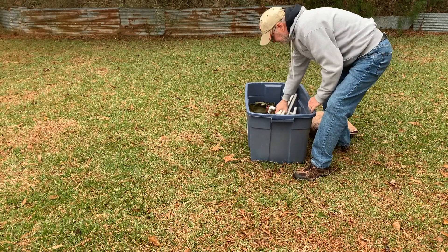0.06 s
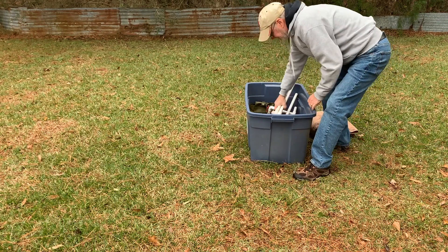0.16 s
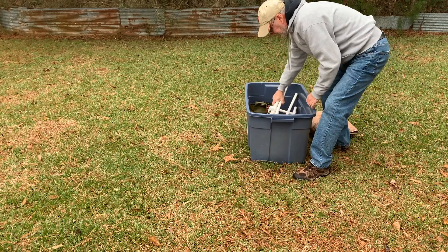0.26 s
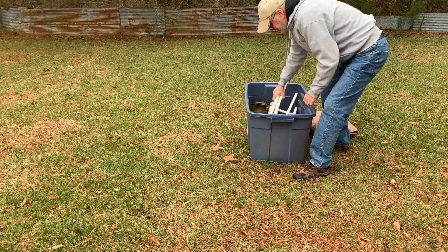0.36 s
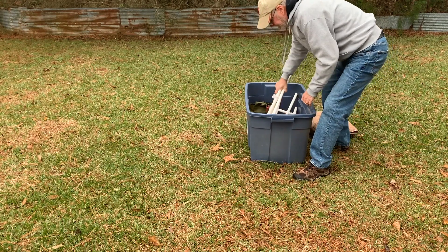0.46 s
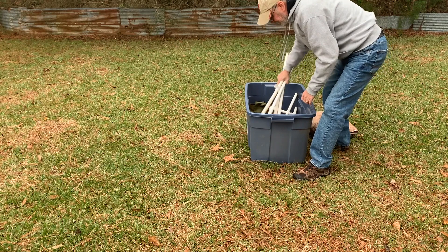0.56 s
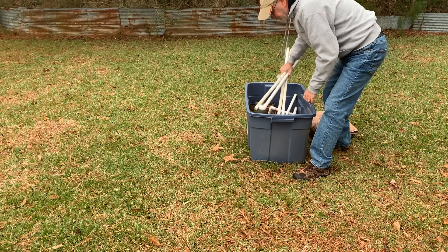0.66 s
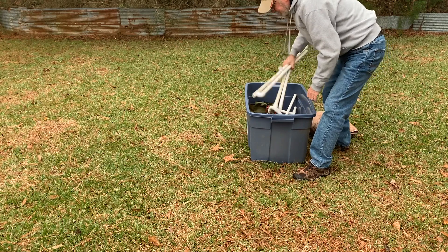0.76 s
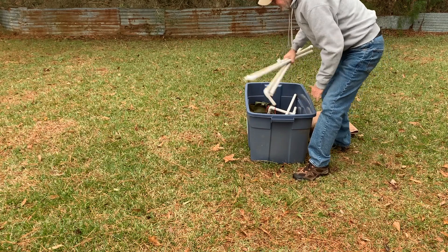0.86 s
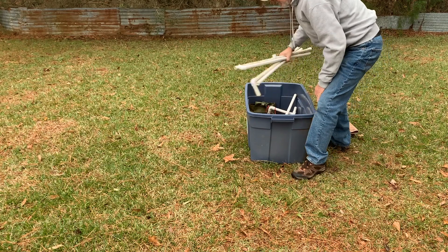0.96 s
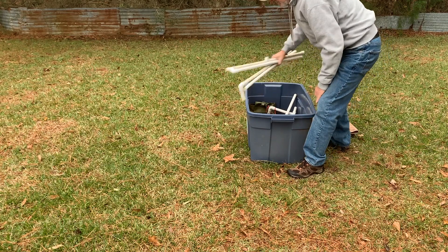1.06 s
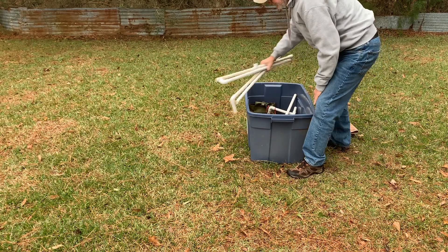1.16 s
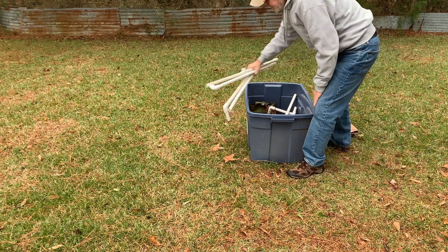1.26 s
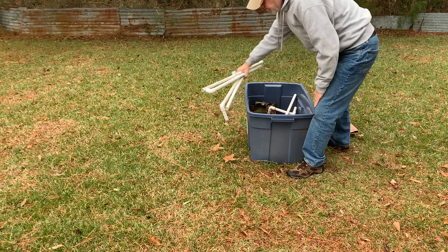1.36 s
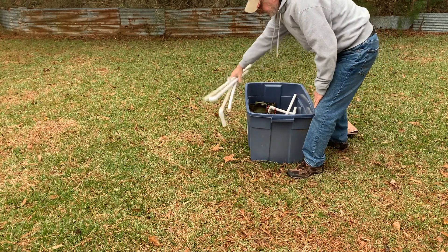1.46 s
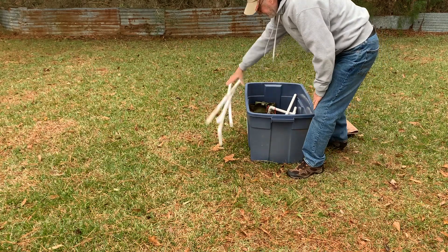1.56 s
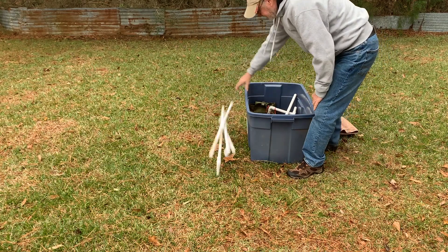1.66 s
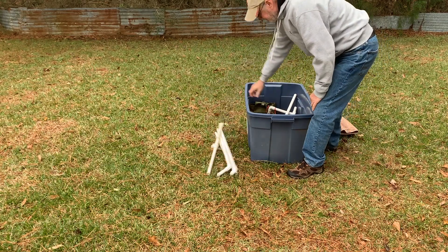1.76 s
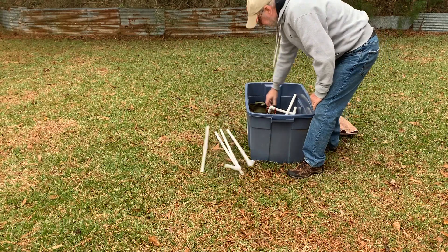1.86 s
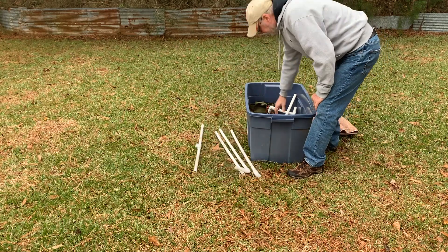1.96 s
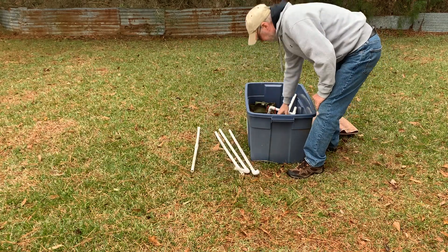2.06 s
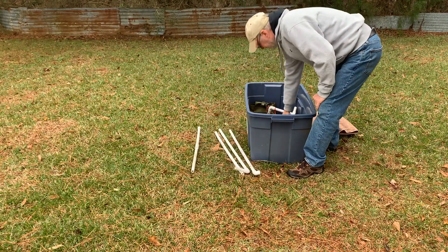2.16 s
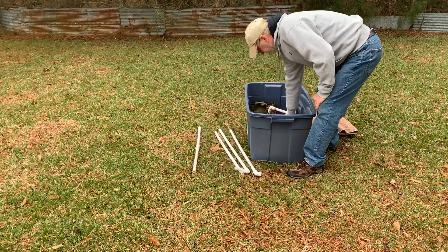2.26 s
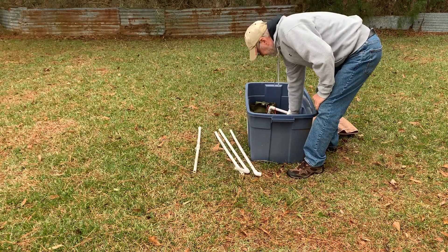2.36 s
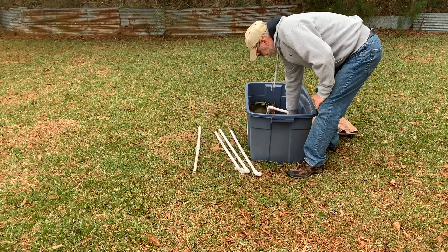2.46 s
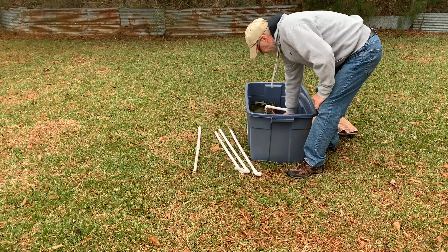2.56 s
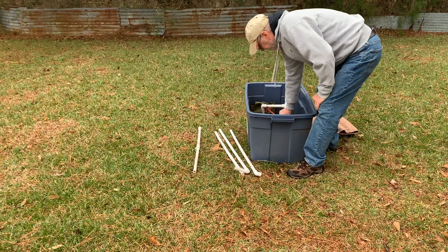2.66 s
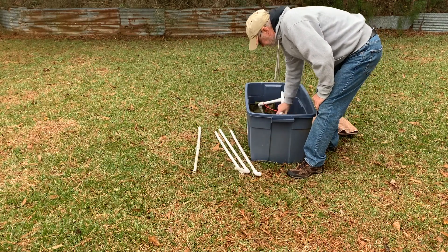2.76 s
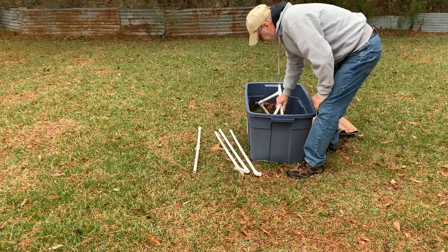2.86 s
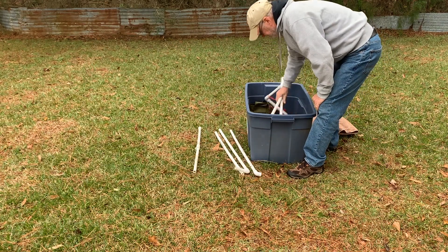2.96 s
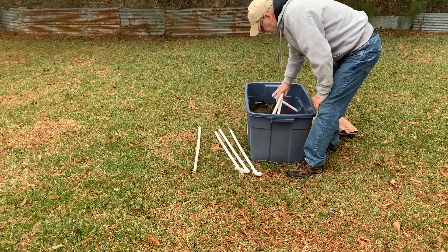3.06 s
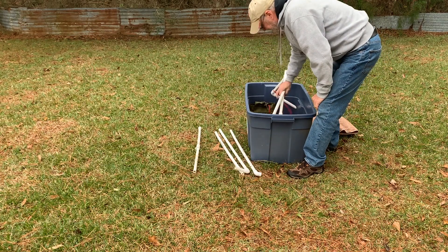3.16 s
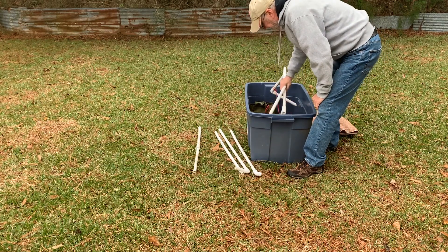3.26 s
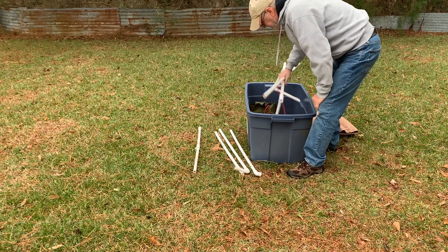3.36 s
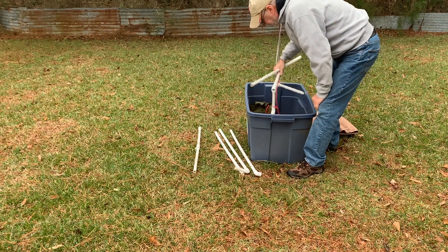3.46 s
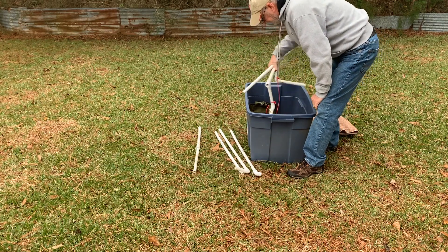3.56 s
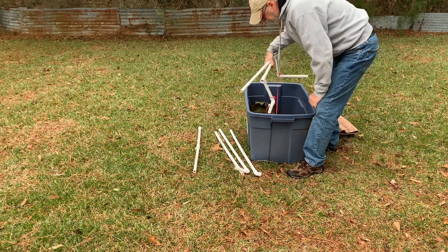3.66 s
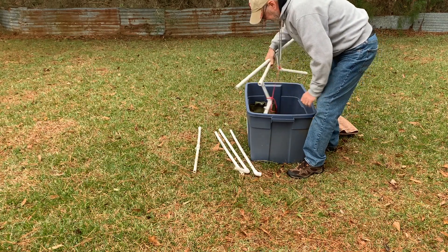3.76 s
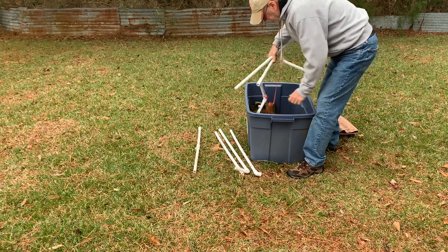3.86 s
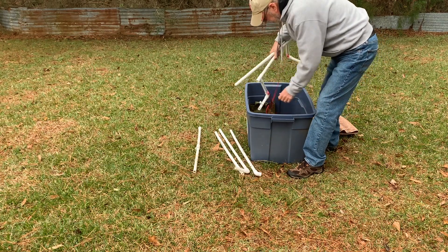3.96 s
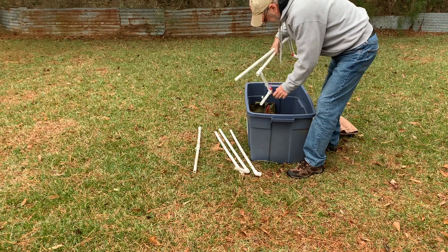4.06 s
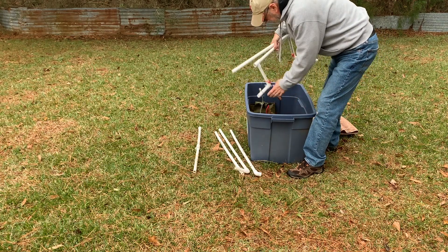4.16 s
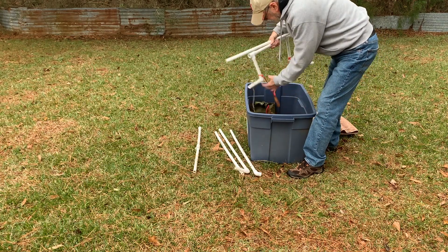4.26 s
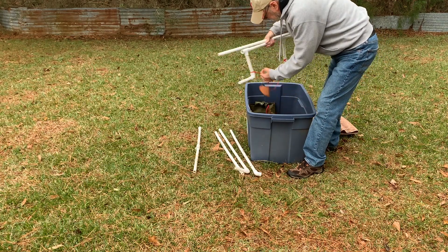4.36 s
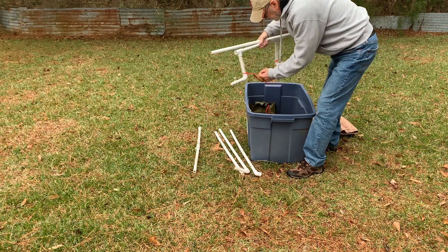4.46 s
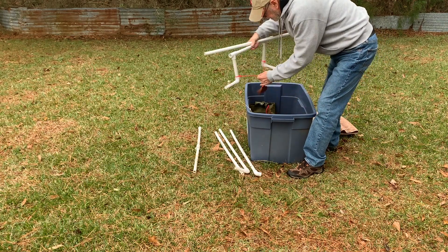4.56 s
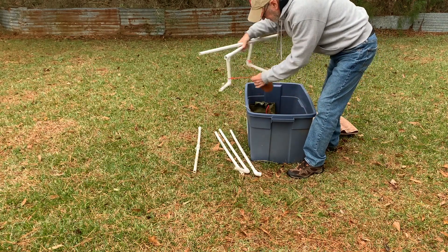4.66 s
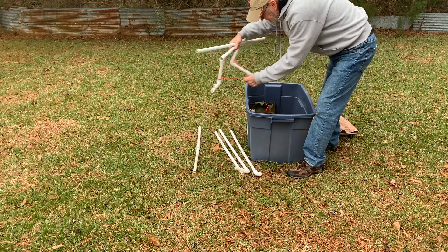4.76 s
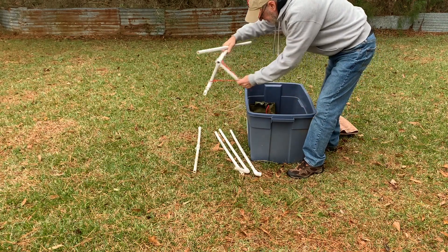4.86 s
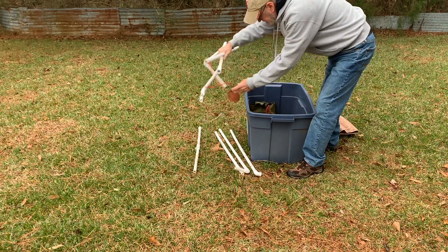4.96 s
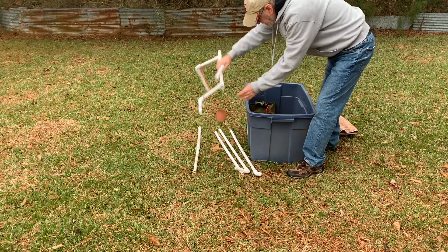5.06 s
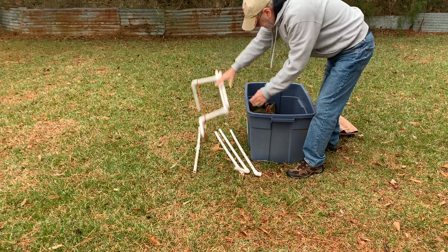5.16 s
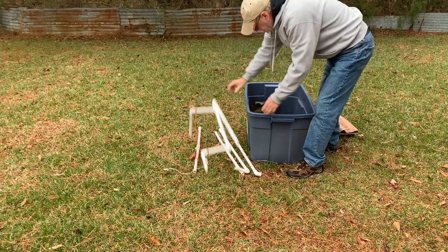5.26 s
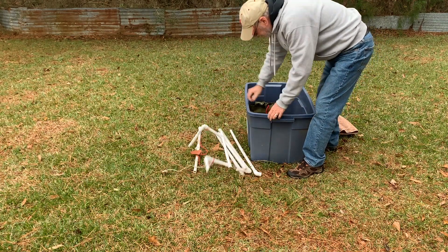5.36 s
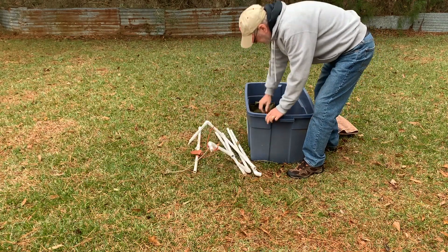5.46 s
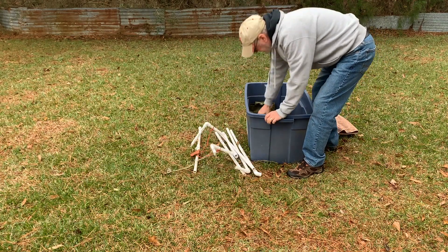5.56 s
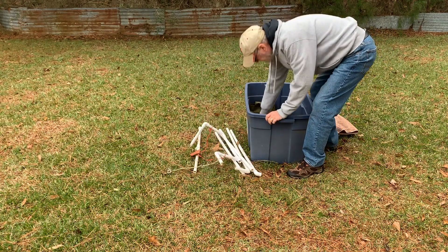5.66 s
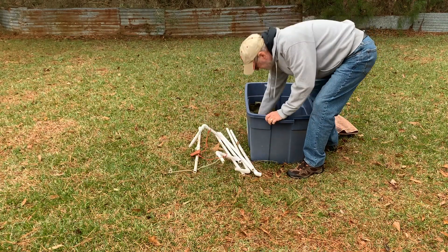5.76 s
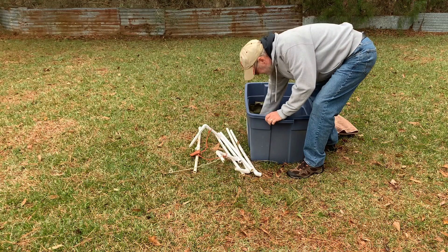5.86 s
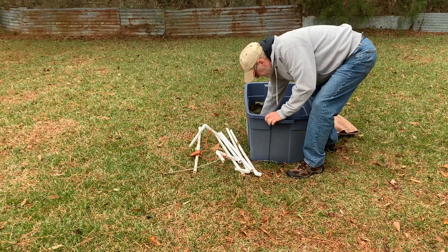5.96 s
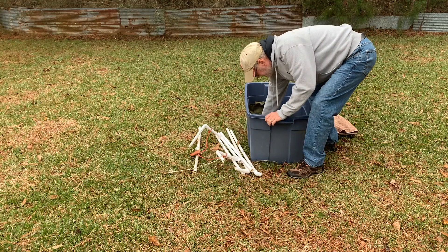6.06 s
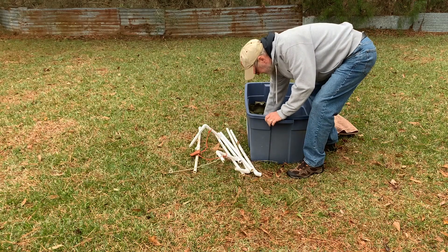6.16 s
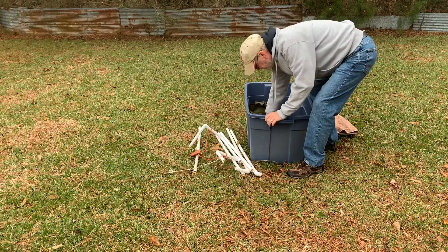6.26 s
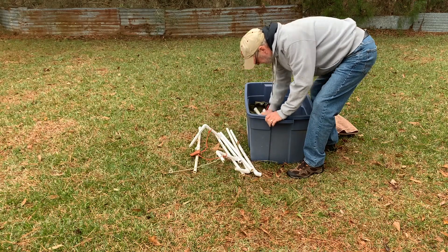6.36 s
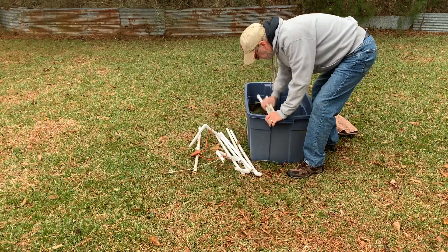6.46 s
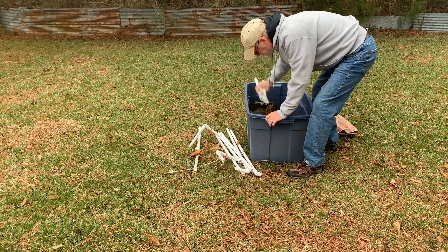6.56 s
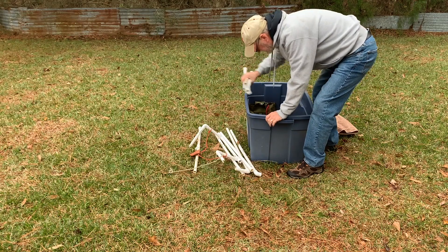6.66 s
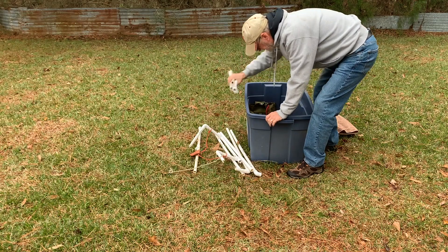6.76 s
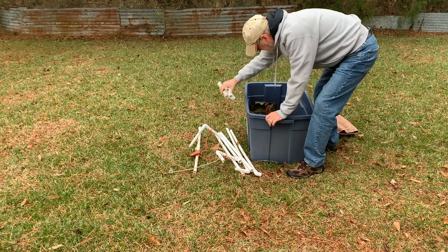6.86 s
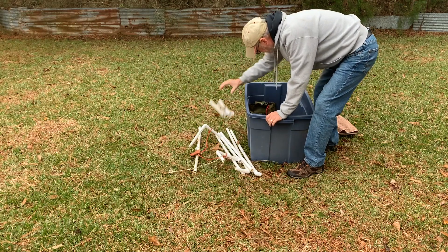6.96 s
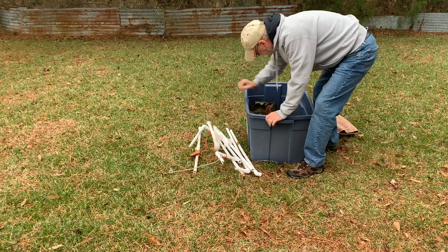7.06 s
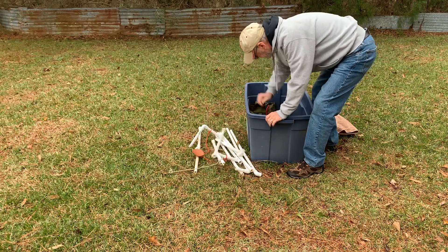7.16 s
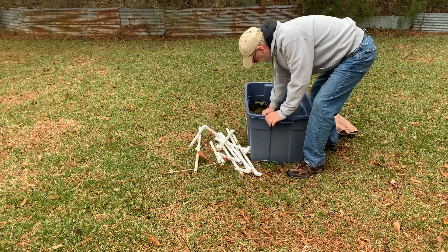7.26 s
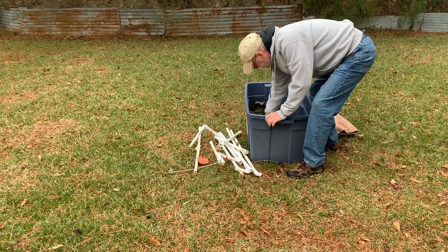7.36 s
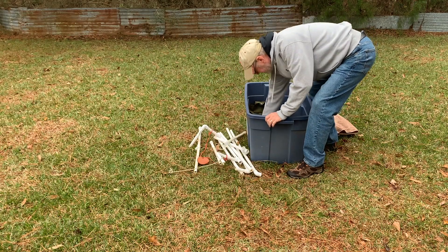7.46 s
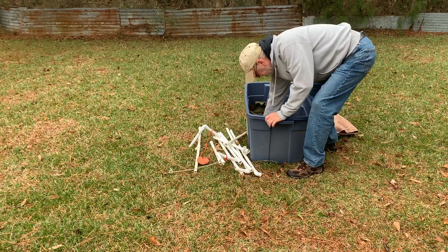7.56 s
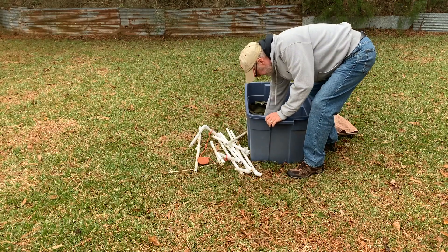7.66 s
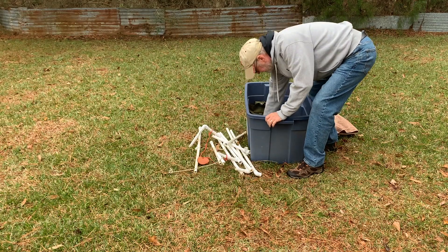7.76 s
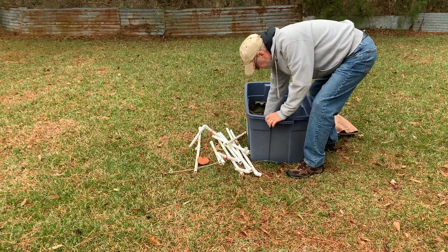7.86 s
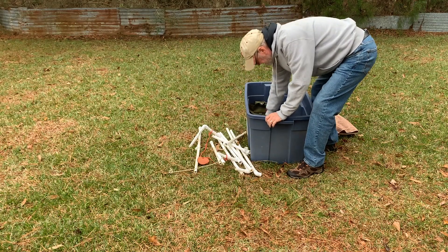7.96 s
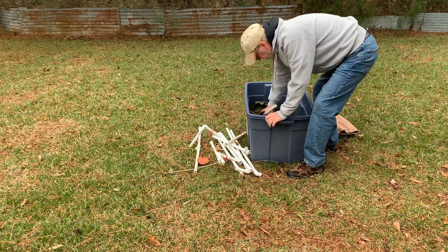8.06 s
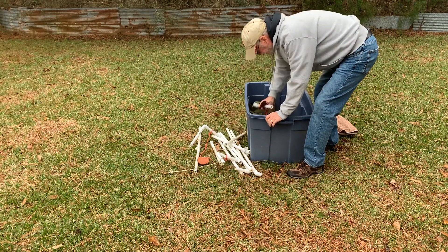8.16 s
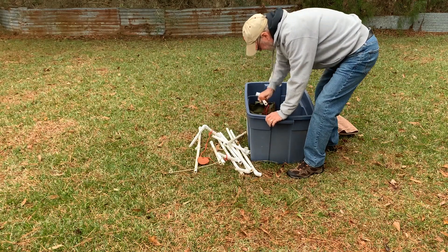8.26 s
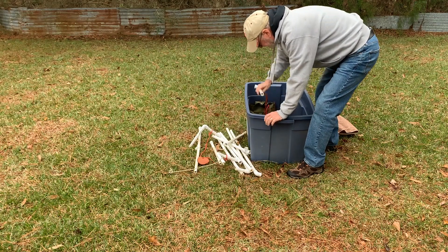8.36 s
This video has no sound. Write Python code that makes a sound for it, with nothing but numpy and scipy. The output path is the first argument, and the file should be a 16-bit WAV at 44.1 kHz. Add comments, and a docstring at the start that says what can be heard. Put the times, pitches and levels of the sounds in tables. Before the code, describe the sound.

Someone pulls plastic pipes from a storage tub in an open yard. Hollow thumps, juddering scrapes and sharp clicks come first, then a bundle lands on grass with a bright clatter. Softer rummaging follows, a faint squeak and rim tap, a second, louder clatter of a jointed frame, more rubbing, and a short fitting rattling down the pile. Close, stereo, with a faint outdoor rumble and hiss.

```python
"""Plastic pipes tossed onto a lawn

Pipes are pulled from a plastic storage tub in a fenced yard. Parts bump, judder and slide on the thin walls,
which boom: dying panel modes plus noise ticks and grainy friction. Two bundles, then a short fitting, land
with a bright clatter of noise cracks and short bending modes. The yard scatters it back as a noise tail.
Rumble and faint hiss lie beneath, as coloured noise."""
import sys
import numpy as np
from scipy import signal
from scipy.fft import rfft, irfft, next_fast_len
from scipy.io import wavfile
from scipy.ndimage import uniform_filter1d

SR = 44100
rng = np.random.default_rng(int(sys.argv[2]) if len(sys.argv) > 2 else 0)


def digitize_waveform(pressure):
    """Quantize a signal to 16-bit integers and store it at the path in sys.argv[1].

    Rows of a 2-D input are taken as channels; values are limited to [-1, 1].
    """
    field = np.atleast_2d(pressure).T
    bounded = np.clip(field, -1, 1)
    quanta = np.round(bounded * 32767).astype(np.int16)
    wavfile.write(sys.argv[1], SR, quanta)


N = 371763
TIME = np.arange(N) / SR
AGE = TIME[:SR // 3]   # time since a blow


def from_db(db):
    """Decibels to gain."""
    return 10 ** (np.asarray(db) / 20)


def at_hz(points, hz):
    """Read a table on a log-frequency axis."""
    known_hz, value = np.transpose(points)
    return np.interp(np.log(hz + 1), np.log(known_hz + 1), value)


def noise(spectrum, size):
    """Noise of a given colour, rms 1."""
    padded = next_fast_len(size)
    hz = np.fft.rfftfreq(padded, 1 / SR)
    white = rng.standard_normal(padded)
    coloured = irfft(rfft(white) * from_db(at_hz(spectrum, hz)), padded)[:size]
    return coloured / coloured.std()


def wander(per_s):
    """Random course through per_s new values a second, joined by straight lines."""
    return np.interp(TIME * per_s, np.arange(N), rng.standard_normal(N))


def crest_one(x, size=88):
    """Scale a blow so that its loudest moment has rms 1."""
    return x / np.sqrt(uniform_filter1d(x * x, size).max())


def add(track, s, sound):
    """Mix a sound in at a time."""
    start = min(max(round(s * SR), 0), N)
    track[start:start + len(sound)] += sound[:N - start]


def ringing(modes, t60, late_cycles, rise_cycles):
    """One dying sine per mode; low modes last longer and start later, as slow bending waves carry them."""
    hz, db = np.transpose(modes)[:, :, None]
    cycles = np.maximum(AGE * hz - late_cycles, 0)
    decay_s = t60 * np.sqrt(hz[0] / hz)   # t60 [s] holds for the first mode
    decay = from_db(db - 60 * cycles / hz / decay_s)
    rise = 1 - np.exp(-cycles / rise_cycles)
    return decay * rise * np.sin(2 * np.pi * cycles)


def strike(shapes, scatter_db, detune=0.062):
    """Each contact feeds the modes with other strengths and signs; the load on the part shifts their pitch."""
    strengths = from_db(scatter_db * rng.standard_normal(len(shapes)))
    weights = strengths * rng.choice([-1, 1], len(shapes))
    stretched_age = AGE * np.exp(detune * rng.standard_normal())
    return crest_one(np.interp(stretched_age, AGE, weights @ shapes, right=0))


def burst(spectrum, hold_s, t60, buzz_db, buzz_t60):
    """Contact noise: it holds while the parts chatter, dies fast and leaves a weak buzz."""
    age = AGE[:len(AGE) // 2]
    main = from_db(-60 * np.maximum(age - hold_s, 0) / t60)
    buzz = from_db(buzz_db - 60 * age / buzz_t60)
    return crest_one((main + buzz) * noise(spectrum, len(age)))


def friction(spectrum, grip_db, slips_per_s):
    """Sliding plastic grips and lets go, so its noise comes in uneven grains; rms 1."""
    grains = noise(spectrum, N) * from_db(grip_db * wander(slips_per_s))
    return grains / grains.std()


STROKE_EASE_S = 0.015   # gentle start and stop


def strokes(rows, mid_share, rise_db, fall_db):
    """Gain of sliding strokes: level runs from db - rise_db to db, part of the way through, to db - fall_db."""
    gain = np.zeros(N)
    for start, end, db in rows:
        points_s = [start, start + mid_share * (end - start), end]
        swell = np.interp(TIME, points_s, from_db([db - rise_db, db, db - fall_db]))
        gain += swell * np.clip(np.minimum(TIME - start, end - TIME) / STROKE_EASE_S, 0, 1)
    return gain


# open air: (frequency [Hz], level [dB per Hz])
AIR_SPECTRUM = [(20, -18), (58, 0.5), (96, -3), (113, -9), (222, -16.5), (434, -23), (949, -31.5),
                (7950, -38), (8650, -31), (10200, -29.5), (16000, -43)]
# (frequency [Hz], left-right correlation [1])
AIR_LIKENESS = [(60, 0.33), (150, 0.43), (400, 0.43), (1500, 0.11), (6500, 0.11), (8500, 1)]
AIR_MID_DB = -58.5   # rms of the part common to both ears


def open_air():
    """Distant rumble and a faint hiss: noise partly alike in both ears."""
    size = next_fast_len(N)
    mid, side = rfft([noise(AIR_SPECTRUM, N), noise(AIR_SPECTRUM, N)], size)
    alike = np.clip(at_hz(AIR_LIKENESS, np.fft.rfftfreq(size, 1 / SR)), 0, 1)
    pair = mid + np.sqrt((1 - alike) / (1 + alike)) * side * [[1], [-1]]
    return from_db(AIR_MID_DB) * irfft(pair, size)[:, :N]


FENCE_S = 0.28   # the tail sinks faster from here


def yard(x, echo_db, t60, edge_s, beyond_db_per_s):
    """Lawn, fence and trees scatter a thin, uneven tail, which sinks faster once it has passed the fence."""
    age = TIME[:SR]
    colour = [(100, -15.0), (400, -5.0), (900, -4.5), (1800, 0), (10000, -1.5), (16000, -5.5)]
    decay = from_db(-60 * age / t60 - beyond_db_per_s * np.maximum(age - edge_s, 0))
    envelope = (1 - np.exp(-age / 0.0031)) * decay
    unevenness = from_db(0.72 * wander(220)[:SR])
    common, left, right = (noise(colour, SR) for _ in range(3))
    response = (common + from_db(-5) * np.array([left, right])) * envelope * unevenness
    response /= np.sqrt(np.sum(response ** 2) / 2)
    return from_db(echo_db) * signal.fftconvolve(x[None], response, axes=1)[:, :N]


def ground_bounce(x, level_db, delay_s, above_hz):
    """The treble's first bounce off the ground reaches the two ears with opposite signs."""
    treble = signal.sosfilt(signal.butter(2, above_hz, "high", fs=SR, output="sos"), x)
    delayed = np.pad(treble, (round(delay_s * SR), 0))[:N]
    return from_db(level_db) * delayed * [[1], [-1]]


# loads meeting the grass: (time [s], level [dB])
LANDINGS = [(1.743, -31), (1.784, -26), (5.387, -16.5), (7.178, -23)]


def turf():
    """The lawn takes each falling load with a soft thud of low, quickly dying modes."""
    out = np.zeros(N)
    modes = [(120, -7.0), (185, 3.0), (215, -4), (290, -6.5)]   # (Hz, dB)
    thud = ringing(modes, t60=0.052, late_cycles=0.06, rise_cycles=0.68)
    for s, db in LANDINGS:
        add(out, s, from_db(db - 1) * strike(thud, scatter_db=0.0))
    return out


# pipes over each other or the grass, or slipping from a hand: (start [s], end [s], level [dB])
SLIDE_STROKES = [(0.98, 1.14, -43), (1.8, 2.12, -46), (2.66, 3.04, -54), (5.27, 5.44, -45.5)]
# hard contact noise: (frequency [Hz], level [dB per Hz])
CRACK_SPECTRUM = [(3500, -9.5), (5000, -8), (6500, -2.5), (8000, -3), (10000, 6), (12000, -5), (14500, -1),
                  (16000, -9)]


def slide():
    """Pipes slide over each other, over the grass or out of a hand: bright, grainy friction noise that swells,
    then fades."""
    pressure = strokes(SLIDE_STROKES, mid_share=0.77, rise_db=18.5, fall_db=31)
    return from_db(-0.5) * pressure * friction(CRACK_SPECTRUM, grip_db=5.0, slips_per_s=690)


# a pipe coming free: (time [s], pitch [Hz], level [dB])
SQUEAK = [(3.07, 2770, -65), (3.211, 2720, -59.5), (3.27, 2620, -72), (3.36, 2660, -67), (3.42, 2600, -74)]


def squeak():
    """Fast stick and slip gives a faint, rough, broken tone that mostly sinks as the pipe slows."""
    s, hz, db = np.transpose(SQUEAK)
    pitch_hz = np.interp(TIME, s, hz) * (1 + 0.06 * wander(1000))
    level = np.interp(TIME, s, from_db(db), 0, 0) * from_db(3.8 * wander(60))
    return level * np.sin(2 * np.pi * np.cumsum(pitch_hz) / SR)


SKID_DB, SKID_S = -19, 0.035   # level relative to the blow, decay time constant


def skids():
    """Gain of the short skid that follows each blow on the tub."""
    out = np.zeros(N)
    age = AGE[AGE < 3 * SKID_S]
    shape = (1 - np.exp(-age / 0.0071)) * np.exp(-age / SKID_S)
    for s, db, _ in TUB_BLOWS:
        add(out, s, from_db(db + SKID_DB) * shape)
    return out


def jostle(scrape, per_s, level_db, spread_db, soft_db_per_octave):
    """While parts are dragged they also nudge the walls, lightly and at random."""
    out = np.zeros(N)
    modes = [(hz, db - soft_db_per_octave * np.log2(hz)) for hz, db in TUB_WALL + TUB_KNOCK]
    wall = ringing(modes, t60=0.081, late_cycles=1.1, rise_cycles=0.89)
    for at in np.flatnonzero((rng.random(N) < per_s / SR) & (scrape > 0)):
        force = scrape[at] * from_db(level_db + spread_db * rng.uniform(-0.3, 1))
        add(out, at / SR, force * strike(wall, scatter_db=3.0, detune=0.088))
    return out


# parts along the tub walls: (start [s], end [s], level [dB])
DRAG_STROKES = [(0.0, 1.04, -47), (2.5, 3.12, -51.5), (3.3, 3.68, -52), (5.6, 6.24, -58),
                (7.53, 8.08, -55.5)]
# low rub of the walls: (frequency [Hz], level [dB per Hz])
TUB_RUB = [(40, -11), (90, 0.5), (200, 5.5), (400, -11.5), (800, -24.5), (3000, -64)]
# brighter scrape: (frequency [Hz], level [dB per Hz])
TUB_SCRAPE = [(100, -12), (400, 3.5), (1500, -7.5), (2400, -11.5), (4200, -16.5), (16000, -43)]


def drag():
    """Parts dragged or skidding on the walls: a low rub, a brighter scrape and random nudges."""
    pressure = strokes(DRAG_STROKES, mid_share=0.27, rise_db=-3.5, fall_db=9.0) + skids()
    rub = from_db(9.5) * pressure * friction(TUB_RUB, grip_db=5.5, slips_per_s=79)
    scrape = from_db(-8.5) * pressure * friction(TUB_SCRAPE, grip_db=7.0, slips_per_s=140)
    nudges = jostle(pressure, per_s=65, level_db=-0.5, spread_db=6, soft_db_per_octave=3.5)
    return rub + scrape + nudges


# a pipe end on the tub wall: (start [s], end [s], level of a slip [dB])
JUDDERS = [(0.049, 0.087, -31.5), (0.134, 0.165, -32), (0.443, 0.471, -34), (2.548, 2.565, -45.5),
           (2.759, 2.773, -39), (3.491, 3.565, -49), (7.658, 7.738, -55)]
SLIP_GAP_S = 0.004   # mean


def judders():
    """Uneven slips follow so quickly that their knocks and ticks run together into a coarse scrape."""
    out = np.zeros(N)
    modes = [(hz, db + 1) for hz, db in TUB_WALL] + TUB_KNOCK
    wall = ringing(modes, t60=0.0387, late_cycles=0, rise_cycles=0.58)
    for start, end, db in JUDDERS:
        for even_s in np.arange(start, end, SLIP_GAP_S):
            s = even_s + SLIP_GAP_S * rng.uniform(-.5, .5)
            slip_db = db + 2 * rng.standard_normal()
            tick = burst(TUB_TICK, hold_s=0, t60=0.02, buzz_db=-27.5, buzz_t60=.06)
            add(out, s, from_db(slip_db) * strike(wall, scatter_db=8.5))
            add(out, s, from_db(slip_db - 13) * tick)
    return out


# stiff rim modes: (frequency [Hz], level [dB])
RIM_MODES = [(183, -8.5), (248, -6), (345, 2), (395, -8), (1000, -11), (1320, -8)]
RIM_TAP_S, RIM_TAP_DB = 4.469, -26.5


def rim_tap():
    """A part lifted clear taps the stiff rim once: a short, pitched knock with hardly any boom."""
    out = np.zeros(N)
    rim = ringing(RIM_MODES, t60=0.067, late_cycles=1.1, rise_cycles=0.099)
    clack = burst(CLACK_SPECTRUM, hold_s=.001, t60=0.048, buzz_db=-24, buzz_t60=.08)
    add(out, RIM_TAP_S, from_db(RIM_TAP_DB) * strike(rim, scatter_db=2.5, detune=0.0086))
    add(out, RIM_TAP_S, from_db(RIM_TAP_DB - 21.5) * clack)
    return out


# light knocks on small hollow parts: (time [s], level [dB], pitch [Hz])
PART_KNOCKS = [(0.043, -24.5, 965), (0.122, -27.5, 790), (0.4228, -25.5, 996), (1.6442, -49.5, 1420),
               (2.527, -32, 853), (2.82, -38, 815), (3.471, -32.5, 890), (3.578, -39.5, 765),
               (3.611, -34.5, 740), (5.606, -33.5, 1500), (5.638, -32, 1010), (6.949, -53, 1237)]
# their modes: (multiple of the pitch [1], level [dB])
PART_MODES = [(0.85, -6.5), (1, 1), (1.17, -6), (1.55, -15)]


def part_knocks():
    """Each small hollow part rings briefly around its own pitch."""
    out = np.zeros(N)
    for s, db, hz in PART_KNOCKS:
        modes = [(hz * multiple, level) for multiple, level in PART_MODES]
        note = ringing(modes, t60=0.025, late_cycles=0, rise_cycles=0.9)
        add(out, s, from_db(db) * strike(note, scatter_db=0.5, detune=0))
    return out


# cut pipe ends catching on an edge: (time [s], level [dB])
END_CLICKS = [(0.043, -30.5), (0.284, -35), (0.44, -20), (0.578, -28), (0.691, -33.5), (0.741, -23),
              (0.7714, -32), (1.768, -12), (1.972, -24.5), (2.748, -33.5), (3.107, -31.5), (3.535, -36),
              (5.3611, -17)]
HARD_CLICK_DB, CRACK_LOSS = -21, 0.64   # lighter clicks lose 0.64 dB of crack per dB under a hard one


def end_clicks():
    """A sharp pipe end snaps off an edge: a tick, with a thin crack on top that weakens in light clicks."""
    out = np.zeros(N)
    for s, db in END_CLICKS:
        crack_db = db - CRACK_LOSS * max(HARD_CLICK_DB - db, 0)
        tick = burst(TUB_TICK, hold_s=0.00054, t60=0.043, buzz_db=-22.0, buzz_t60=0.14)
        crack = burst(CRACK_SPECTRUM, hold_s=0.0011, t60=0.018, buzz_db=-20, buzz_t60=0.13)
        add(out, s, from_db(db - 3.0) * tick)
        add(out, s, from_db(crack_db) * crack)
    return out


# parts bumping the tub: (time [s], level [dB], hardness as knock over boom [dB])
TUB_BLOWS = [(0.087, -24, -3.5), (0.12, -28.5, -3), (0.147, -25, 8.5), (0.285, -37.5, 0), (0.423, -32.5, 6),
             (0.471, -25.5, -2.5), (0.484, -13, 1.5), (0.549, -19, 3), (0.578, -23, 7), (0.691, -20, 3),
             (0.741, -25, 6.5), (0.896, -23, 5), (1.972, -17, 4.5), (2.346, -46.5, -10), (2.546, -29, -3),
             (2.604, -41.5, -0.5), (2.746, -33.5, -6.5), (2.782, -34, -4), (2.818, -35, -2),
             (2.87, -42, -1), (3.045, -41, 0), (3.107, -17, -1), (3.324, -35, -6), (3.37, -25.5, -7.5),
             (3.471, -28, -10.5), (3.486, -28, -2.5), (3.534, -29.5, -2.5), (5.607, -37, 3.5),
             (5.637, -39.5, 2.5), (5.749, -29.5, 5), (5.865, -28, 0.5), (6.037, -41, -6), (6.082, -32, 2.5),
             (7.279, -15.5, -0.5), (7.316, -20, 3.5), (7.543, -27.5, -8.5), (7.596, -32.5, 1.5),
             (7.664, -34.5, -9), (7.715, -33.5, -9), (7.75, -25, 4), (7.87, -29, -12.5),
             (7.903, -34.5, -5.5), (7.953, -30.5, -12)]
# low panel modes: (frequency [Hz], level [dB])
TUB_BOOM = [(53, -20), (84, -8), (112, -6.5), (140, -2.5), (163, -7), (190, 2), (222, -1.5), (248, -5.5)]
# middle panel modes: (frequency [Hz], level [dB])
TUB_WALL = [(278, 0), (312, 1.5), (345, 0.5), (388, -1.5), (445, 2.5), (545, -4), (610, -3), (680, -6)]
# high panel modes: (frequency [Hz], level [dB])
TUB_KNOCK = [(760, -8), (845, 4), (940, -2), (1030, 0.5), (1150, -6), (1310, -2.5), (1480, -1),
             (1640, -6.5), (1820, -12), (2100, -11)]
# contact noise on the tub: (frequency [Hz], level [dB per Hz])
TUB_TICK = [(1500, -10), (2500, 3), (3800, 11), (5300, -4), (7500, 4), (10000, 1), (12500, -14.5),
            (16000, -15.5)]
TICK_DB, TICK_PER_HARDNESS = -25, 0.6   # relative to the blow; dB per dB of hardness
# under this level the part stays on the wall and damps it: extra dB per s for each dB
FREE_BLOW_DB, HELD_DAMPING = -20.5, 9


def tub():
    """A blow gives a tick, a knock and the slow boom of the panels; hard corners knock, flat sides boom."""
    out = np.zeros(N)
    boom = ringing(TUB_BOOM, t60=0.34, late_cycles=1.1, rise_cycles=0.21)
    wall = ringing(TUB_WALL, t60=0.093, late_cycles=1.1, rise_cycles=0.28)
    knock = ringing(TUB_KNOCK, t60=0.048, late_cycles=0.83, rise_cycles=0.19)
    for s, db, hardness in TUB_BLOWS:
        damped = from_db(-HELD_DAMPING * max(FREE_BLOW_DB - db, 0) * AGE)
        tick_db = db + TICK_DB + TICK_PER_HARDNESS * hardness
        tick = burst(TUB_TICK, hold_s=0.00067, t60=0.065, buzz_db=-18.5, buzz_t60=.09)
        add(out, s, from_db(db - hardness / 2 + 5.5) * damped * strike(boom, scatter_db=4.5, detune=0.058))
        add(out, s, from_db(db + 0.5) * damped * strike(wall, scatter_db=5.0))
        add(out, s, from_db(db + hardness / 2 - 7.5) * strike(knock, scatter_db=0.5, detune=.08))
        add(out, s, from_db(tick_db) * tick)
    return out


# the jointed frame rocking on the pile: (time [s], level [dB])
FRAME_BUMPS = [(5.427, -33.5), (5.485, -38.5), (5.553, -47.5)]
# its modes: (frequency [Hz], level [dB])
FRAME_MODES = [(265, -5.5), (405, 2), (720, -4)]


def frame_bumps():
    """The jointed pipe frame bends slowly each time it rocks: a low, hollow note under the clatter."""
    out = np.zeros(N)
    bending = ringing(FRAME_MODES, t60=0.23, late_cycles=0, rise_cycles=1)
    for s, db in FRAME_BUMPS:
        add(out, s, from_db(db) * strike(bending, scatter_db=3.5, detune=0))
    return out


# first touchdown of each load; end-on landings bend it: (time [s], extra hollow ring [dB])
TOSSES = [(1.745, 11.5), (5.355, -3), (7.102, 14.5)]


def latest_toss(s):
    """Time since the last load touched down, and its extra hollow ring; before the first there is no extra."""
    return min([(s - start, db) for start, db in TOSSES if start <= s], default=(np.inf, 0))


# low bending modes: (frequency [Hz], level [dB])
HOLLOW_MODES = [(395, -4), (490, -4.5), (620, -4.5), (725, -7), (829, -1.5), (985, 1.5), (1130, -2.5)]
# duller contact noise: (frequency [Hz], level [dB per Hz])
CLACK_SPECTRUM = [(150, -34.5), (700, -19), (1500, 1), (3100, 2.5), (4000, -1.5), (5500, -15),
                  (9000, -33.5)]
BENDING_S = 0.14       # the extra hollow ring is gone by then
HOLLOW_FOLLOWS = 0.6   # share of a hit's dB that the hollow modes follow
RING_TILT_DB = 5.5     # per octave at a 0 dB hit: brief, so it favours the upper modes
CLACK_DULLS, SETTLED_RING = 0.26, 0.15   # shares of the lost crack: taken from the clack, given to the ring


def clatter(hits, ring_modes, ring_t60, ring_db, clack_db, hollow_db, crack_db, chatter_s, detune):
    """Hard plastic on plastic: crack, clack and short bending modes; harder hits chatter longer.
    A toss changes the hollow ring of its first touches; soft contacts lose crack and leave the ring."""
    out = np.zeros(N)
    ring = ringing(ring_modes, ring_t60, late_cycles=1.2, rise_cycles=0.37)
    octaves = np.log2(np.array(ring_modes)[:, :1] / ring_modes[0][0])
    hollow = ringing(HOLLOW_MODES, t60=0.13, late_cycles=.8, rise_cycles=0.37)
    for s, db, lost_db in hits:
        since_s, bending_db = latest_toss(s)
        hit_hollow_db = HOLLOW_FOLLOWS * db + bending_db * max(1 - since_s / BENDING_S, 0)
        hit_ring_db = db + ring_db + SETTLED_RING * lost_db
        hit_clack_db = db + clack_db - CLACK_DULLS * lost_db
        strength = from_db(db / 2)
        hold_s = chatter_s * strength
        tilt = from_db(RING_TILT_DB * strength * octaves)
        clack = burst(CLACK_SPECTRUM, hold_s, t60=0.025, buzz_db=-20.5, buzz_t60=0.16)
        crack = burst(CRACK_SPECTRUM, hold_s, t60=0.015, buzz_db=-23, buzz_t60=0.2)
        add(out, s, from_db(hit_ring_db) * strike(tilt * ring, scatter_db=2.5, detune=detune))
        add(out, s, from_db(hit_hollow_db + hollow_db) * strike(hollow, scatter_db=4.0, detune=0.072))
        add(out, s, from_db(hit_clack_db) * clack)
        add(out, s, from_db(db + crack_db - lost_db) * crack)
    return out


# bounces down the pile: (time [s], level [dB], softness as crack lost [dB])
FITTING_HITS = [(7.1043, -9, 1.5), (7.1314, -17, 1), (7.148, -19, 6), (7.1576, -7.5, -1), (7.174, -11.5, 5),
                (7.1806, -2, 2.5), (7.1864, -4.5, 2), (7.222, -5, 2.5), (7.2384, -16, 7.5),
                (7.2505, -15.5, 8), (7.2574, -11.5, 9.5), (7.3332, -15, 31.5), (7.3672, -27, 29),
                (7.3916, -33, 34), (7.4111, -31.5, 35.5)]
# bending modes: (frequency [Hz], level [dB])
FITTING_MODES = [(1242, -3.5), (1410, 6.5), (1755, 1), (1956, 2), (2322, -0.5), (2520, 2), (2812, 2),
                 (3650, -8.5)]


def fitting():
    """The short fitting bounces down the pile and rattles to rest, its last contacts soft."""
    return clatter(FITTING_HITS, FITTING_MODES, ring_t60=0.036, ring_db=-11.0, clack_db=-6.5,
                   hollow_db=-27.5, crack_db=-0.5, chatter_s=0.0028, detune=0.022)


# pipe against pipe: (time [s], level [dB], softness as crack lost [dB])
PIPE_HITS = [(0.6724, -32, 10), (0.7383, -21.5, 7.5), (1.7498, -8.5, 5.5), (1.7744, -1, 0),
             (1.783, -4, 5.5), (1.8082, -5, -2), (1.8125, -6, 4), (1.8255, -14.5, 3), (1.9042, -31.5, 14.5),
             (5.3782, -10.5, 3.5), (5.387, -2, -1), (5.406, -3, -0.5), (5.4143, -2.5, 1.5),
             (5.4263, -12.5, 8), (5.4849, -17, 1), (5.5112, -23, 3), (5.677, -10, 5), (5.7098, -24.5, 14),
             (5.7658, -26.5, 16), (5.8165, -25, 11), (5.8364, -30.5, 10)]
# bending modes: (frequency [Hz], level [dB])
PIPE_MODES = [(1420, -2.5), (1516, -0.5), (1650, -2.5), (1790, 2.4), (1960, -5.5), (2170, -0.5),
              (2374, -0.5), (2760, -3.5), (2890, 1.9), (3226, -1.35), (3760, -7.5)]


def pipes():
    """Pipe strikes pipe, above all as the two bundles land; glancing or settling contacts are soft."""
    return clatter(PIPE_HITS, PIPE_MODES, ring_t60=.05, ring_db=-8.0, clack_db=-4.5,
                   hollow_db=-27.0, crack_db=3.0, chatter_s=0.0017, detune=0.024)


def scene():
    """Tub, pipes and lawn in the open yard."""
    tub_sounds = drag() + judders() + rim_tap() + part_knocks() + end_clicks() + tub()
    pile_sounds = turf() + slide() + squeak() + frame_bumps() + fitting() + pipes()
    direct = tub_sounds + pile_sounds
    echoes = yard(direct, echo_db=-20, t60=0.51, edge_s=FENCE_S, beyond_db_per_s=88.0)
    bounce = ground_bounce(direct, level_db=-10.0, delay_s=0.0019, above_hz=1500)
    return open_air() + echoes + bounce + direct


# the two microphone ports: (frequency [Hz], phase by which left leads [rad])
PORT_PHASE = [(0, 0), (50, .6), (210, .7), (340, 0), (700, -.45), (1600, -.65), (2300, .3), (2950, 1.8),
              (4200, .7), (6800, -.4), (8500, -3.1), (11000, -6.2), (13500, -9.4), (15500, -12.5)]
# (frequency [Hz], left minus right [dB])
PORT_BALANCE = [(30, 2), (80, 6.5), (180, 1.2), (350, 2.4), (1100, 4.2), (2800, 1.4), (5000, -1.6),
                (9000, 0)]
CUTOFF_HZ, OVERLOAD_LEVEL = 16000, 0.75


def record(dry):
    """Two ports differ in phase and level; the loudest cracks overload, and the top is cut."""
    size = next_fast_len(N + SR // 10)
    hz = np.fft.rfftfreq(size, 1 / SR)
    half = np.array([[1], [-1]]) / 2
    balance = from_db(half * at_hz(PORT_BALANCE, hz))
    phase = np.exp(1j * half * np.interp(hz, *np.transpose(PORT_PHASE)))
    heard = irfft(rfft(dry, size) * balance * phase, size)[:, :N]
    wind_filter = signal.butter(2, 34, "high", fs=SR, output="sos")
    heard = signal.sosfilt(wind_filter, heard)
    overloaded = OVERLOAD_LEVEL * np.tanh(heard / OVERLOAD_LEVEL)
    top_cut = signal.ellip(10, .1, 70, CUTOFF_HZ, fs=SR, output="sos")
    return signal.sosfilt(top_cut, overloaded)


dry = scene()
out = record(dry)
digitize_waveform(out)
```